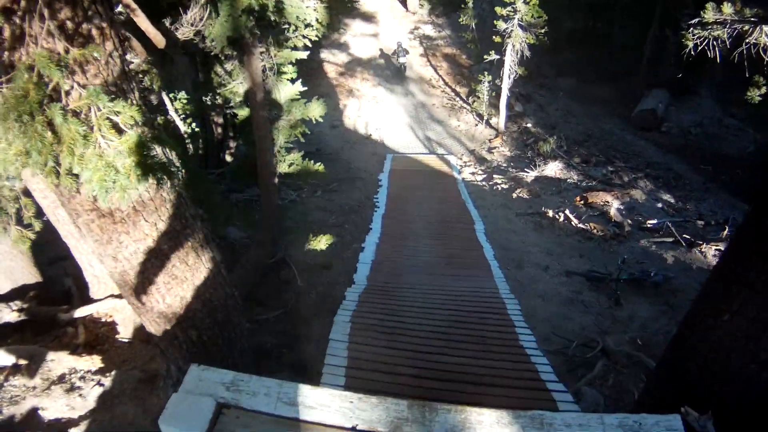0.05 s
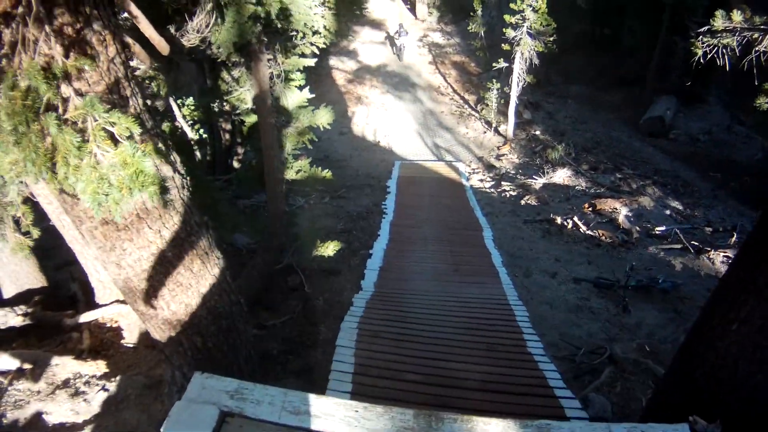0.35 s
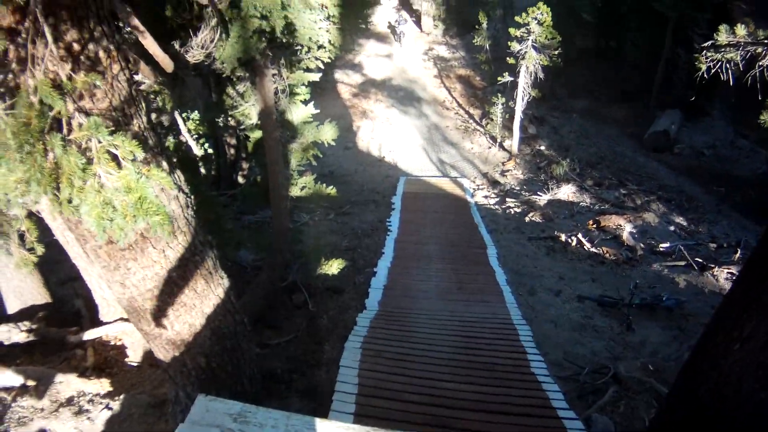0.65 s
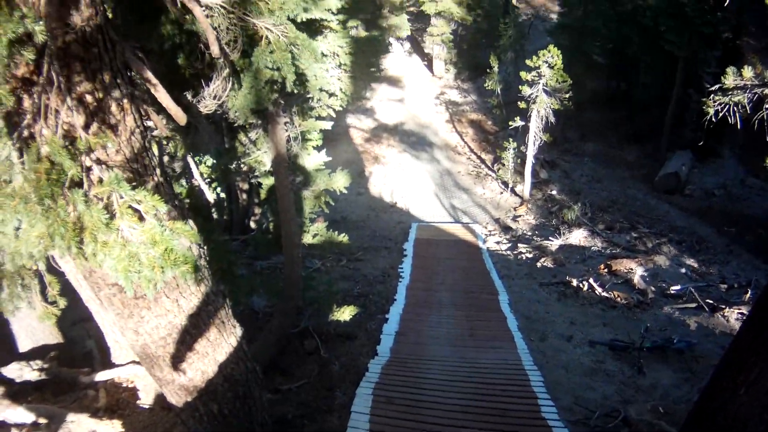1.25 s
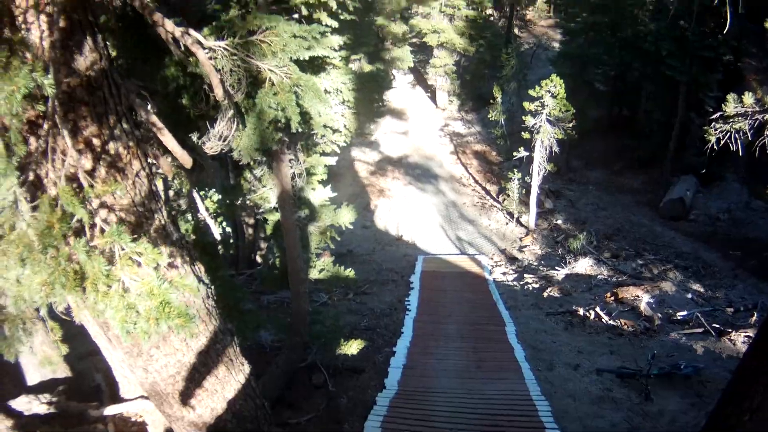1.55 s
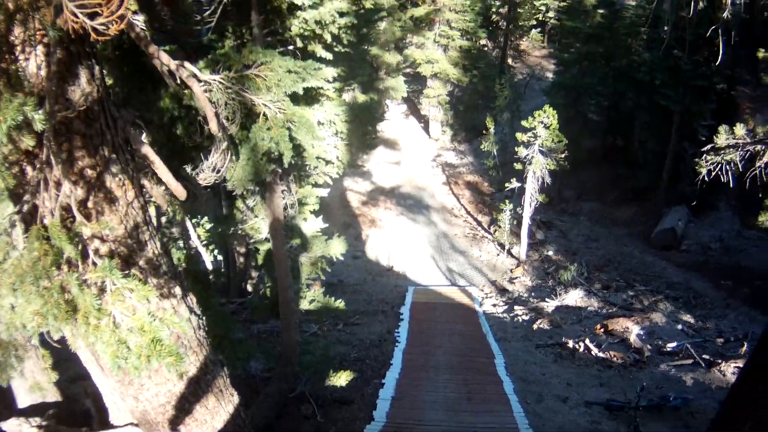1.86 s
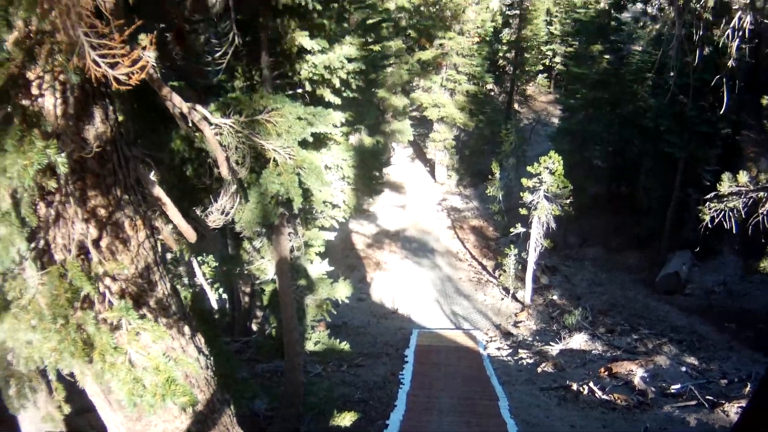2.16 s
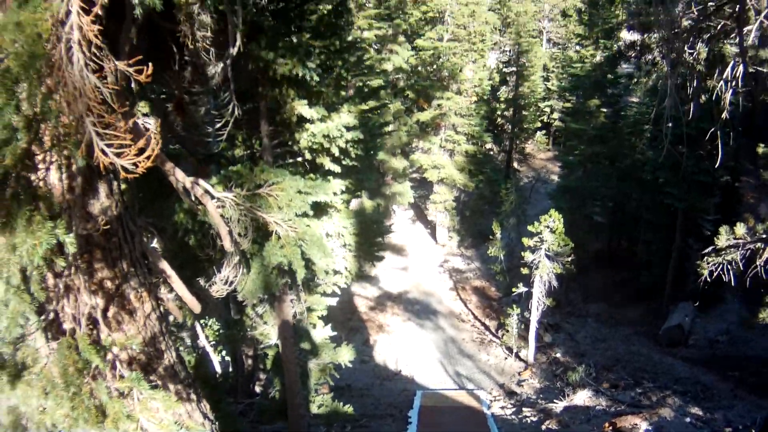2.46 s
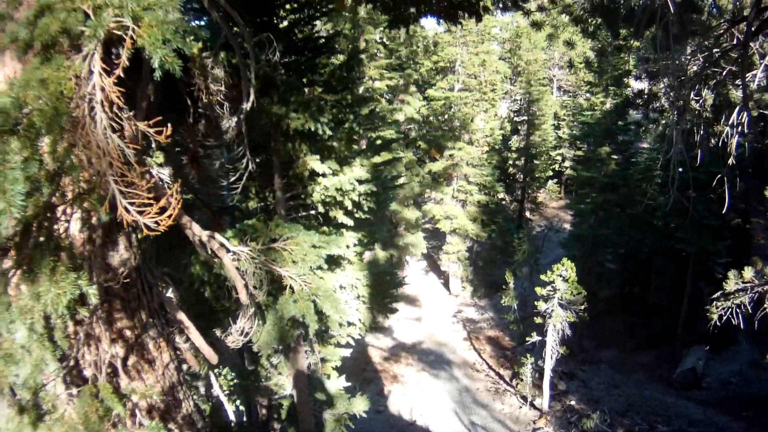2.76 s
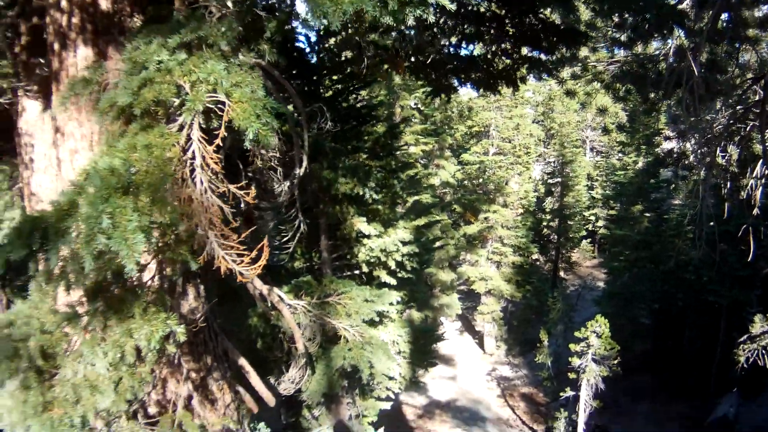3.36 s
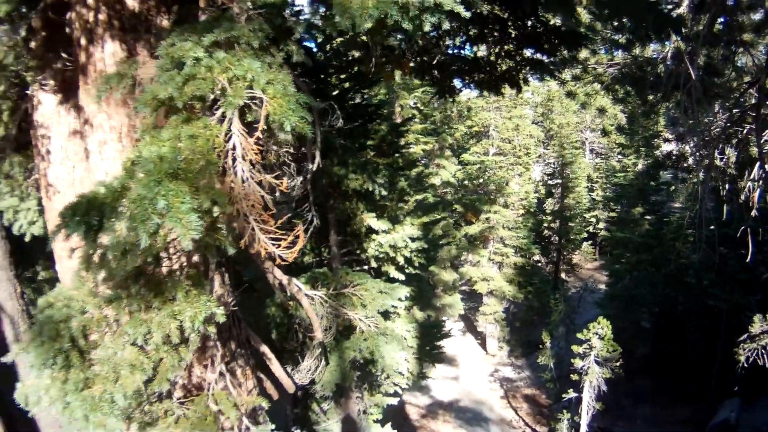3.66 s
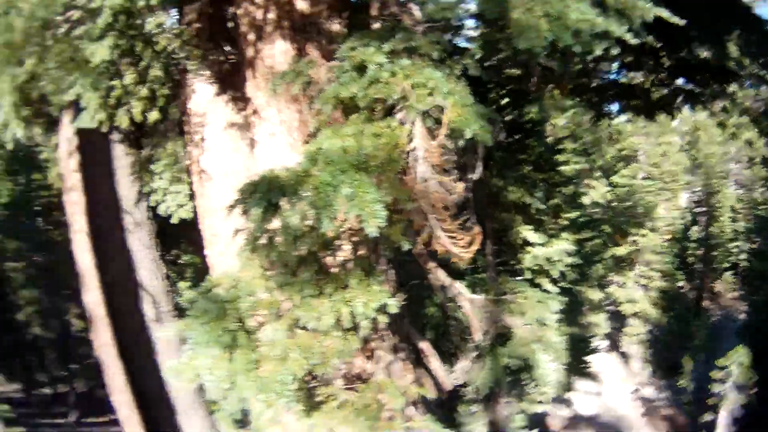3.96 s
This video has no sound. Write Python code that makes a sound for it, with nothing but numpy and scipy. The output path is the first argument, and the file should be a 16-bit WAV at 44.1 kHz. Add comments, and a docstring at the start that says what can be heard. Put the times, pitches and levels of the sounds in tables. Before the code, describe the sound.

Handling noise on a hand-held camera in a still forest. Faint hiss and a soft electronic buzz run with a few light finger bumps, then fingers rub the case and knock it sharply, right at the microphone.

```python
"""Hiss, a soft frame-rate buzz and a thin whine: the electronics of a hand-held camera in a still forest.
The buzz is a current switching on and off once a frame. Fingers bump the case now and then and its
modes ring; the grip creaks faintly. Near the end the fingers rub over the case in stick-slip grains
and knock it, and the loudest knock overloads the microphone."""
import sys
import numpy as np
from scipy import signal
from scipy.fft import rfft, irfft
from scipy.io import wavfile

SR = 44100
rng = np.random.default_rng(int(sys.argv[2]) if len(sys.argv) > 2 else 0)


def unload_wav(signal):
    """Save mono or channel-first audio to the path in sys.argv[1] as 16-bit WAV at rate SR, clipped to [-1, 1]."""
    wavfile.write(
        sys.argv[1],
        SR,
        np.round(np.clip(np.atleast_2d(signal).T, -1, 1) * 32767).astype(np.int16),
    )


N = 176400  # 4 s


def undb(db):
    """Decibels to gain."""
    return 10 ** (np.asarray(db) / 20)


def unit(x):
    """Scale to rms 1."""
    return x / np.std(x)


def cut(x, hz, kind="low", order=2):
    """Low-pass or high-pass."""
    return signal.sosfilt(signal.butter(order, min(hz, .45 * SR), kind, fs=SR, output="sos"), x)


def band(x, hz, width_hz):
    """One resonance, gain 1 at the centre."""
    return signal.lfilter(*signal.iirpeak(hz, hz / width_hz, fs=SR), x)


def noise():
    """White noise."""
    return rng.standard_normal(N)


def wander(hz):
    """Random drift below hz, rms 1."""
    return unit(cut(noise(), hz))


# Each row: mode frequency in Hz, gain in dB, decay time T60 in seconds.
CASE_MODES = [(169.2, 2, 0.11), (249.3, -1, 0.12), (296, 2, 0.027), (550, 2, 0.12), (675, 6, 0.038),
              (940, 6.5, 0.034), (1013, 5.5, 0.029), (1272, 5, 0.027), (1736, 4, 0.038), (1867, 4, 0.017),
              (2320, 3, 0.02), (2570, -2.5, 0.039), (3080, -7.5, 0.053), (3170, -9, 0.052),
              (4580, -20, 0.058), (5670, -26, 0.03)]

def case_ring(drive):
    """The camera case rings in damped modes."""
    return sum(undb(db) * band(drive, hz, np.log(1000) / np.pi / t60_s) for hz, db, t60_s in CASE_MODES)


# Each row: start in seconds, clack in dB, thump in dB, contact length in seconds, low-pass in Hz.
KNOCK_HITS = [(3.7209, 4, -11, 0.00857, 3830), (3.8358, -4.5, -24, .007, 1800),
              (3.926, -8.5, -32, 0.01, 5150), (3.9458, 26.5, -3.5, 0.0048, 9900),
              (3.958, -2, -43, 0.00086, 14000)]
# Each row: start in seconds, push level in dB.
FINGER_BUMPS = [(.305, -37), (0.681, -41), (1.74, -33.5), (2.394, -30), (3.389, -33), (3.587, -32),
                (3.652, -26), (3.755, -29)]

def knocks(t, push_hz=161.3, push_width_hz=64, crack_db=-50, crack_hz=7900):
    """Hard contacts and soft pushes ring the case; the hard ones also crack directly."""
    hard, soft = np.zeros(N), np.zeros(N)
    for start_s, clack_db, thump_db, length_s, top_hz in KNOCK_HITS:
        i = int(start_s * SR)
        contact = cut(clatter(length_s), top_hz, order=4)[:N - i]
        hard[i:i + len(contact)] += undb(clack_db) * contact
        soft += undb(thump_db) * push(t, start_s)
    for start_s, db in FINGER_BUMPS:
        soft += undb(db) * push(t, start_s)
    thumps = band(band(soft + 1e-18, push_hz, push_width_hz), push_hz, push_width_hz)
    crack = cut(cut(hard + 1e-18, crack_hz, order=1), 170, "high")
    return case_ring(hard + thumps) + undb(crack_db) * crack


def clatter(length_s, chatter_db=-7.5, chatter_s=0.0031):
    """A brief hard, rough contact that dies away in fine chatter."""
    grit = rng.standard_normal(4096)
    age_s = np.arange(len(grit)) / SR
    window = np.sqrt(np.abs(np.sin(np.pi * np.minimum(age_s / length_s, 1))))
    for _ in range(12):  # flatten the spectrum
        spectrum = rfft(grit * window)
        grit = irfft(spectrum / (np.abs(spectrum) + 1e-12))
    grit *= window
    chatter = np.exp(-age_s / chatter_s) * rng.standard_normal(len(grit)) / np.sqrt(chatter_s * SR / 2)
    return grit / np.linalg.norm(grit) + undb(chatter_db) * chatter


def push(t, start_s, length_s=0.0022):
    """A soft half-sine push of a fingertip."""
    return np.sin(np.pi * np.clip((t - start_s) / length_s, 0, 1))


# Each row: time in seconds, rub level in dB, rumble level in dB.
SLIDE_LEVELS = [(3.3, -95, -76), (3.6, -78, -68.5), (3.69, -68, -57), (3.715, -60.5, -50),
                (3.765, -55, -39), (3.79, -58, -53), (3.821, -47.5, -44), (3.86, -57.5, -46),
                (3.91, -57, -52), (3.96, -39, -50), (4.0, -42, -41)]
# Each row: centre in Hz, width in Hz, relative gain in dB.
RUB_BANDS = [(294, 72, -6), (770, 290, -1), (1007, 100, 11), (1230, 160, -37), (1760, 320, -3.5),
             (2470, 130, -5), (3270, 250, -9), (3860, 280, -5.5), (4080, 260, -9)]

def finger_slide(t, grain_depth=0.12, top_hz=4330, hiss_db=-18.5, rumble_hz=130):
    """Skin sticks and slips on the case in fine grains, over the rumble of the grip."""
    times_s, rub_db, rumble_db = np.array(SLIDE_LEVELS).T
    grains = noise() * np.exp(grain_depth * wander(500))
    body = sum(undb(db) * band(grains, hz, width_hz) for hz, width_hz, db in RUB_BANDS)
    rub = unit(cut(body, top_hz, order=16)) + undb(hiss_db) * unit(cut(grains, 5500))
    rumble = unit(cut(cut(noise(), rumble_hz, order=3), 23, "high"))
    return rub * undb(np.interp(t, times_s, rub_db)) + rumble * undb(np.interp(t, times_s, rumble_db))


FRAME_HZ = 29.97

def frame_buzz(t, first_s=.0305, on_s=.007, step_db=-46.5, off_boost_db=2.5, sag_hz=84.6, edge_hz=895):
    """A current switches on and off once a frame; each step sags away."""
    starts_s = np.arange(first_s - 1 / FRAME_HZ, N / SR, 1 / FRAME_HZ)
    on_size, off_size = undb(1.5 * rng.standard_normal((len(starts_s), 2))).T  # 1.5 dB scatter
    steps = np.zeros(N)
    for when_s, size in ((starts_s, on_size), (starts_s + on_s, -undb(off_boost_db) * off_size)):
        inside = (when_s > 0) & (when_s < t[-1])
        steps[(when_s[inside] * SR).astype(int)] = size[inside]
    sagging = signal.lfilter([1], [1, -np.exp(-2 * np.pi * sag_hz / SR)], steps)
    return undb(step_db) * cut(sagging, edge_hz)


def whine(t, base_hz=235.65, base_db=-75, db_per_octave=-4):
    """The electronics whine thinly in odd harmonics, from the third up."""
    tone = np.zeros(N)
    for k in range(3, 40, 2):
        rms = undb(base_db + db_per_octave * np.log2(k))
        tone += np.sqrt(2) * rms * np.sin(2 * np.pi * (k * base_hz * t + rng.random()))
    return tone


# Each row: peak time in seconds, level in dB, Gaussian sigma in seconds.
CREAK_SWELLS = [(0.463, -73, .006), (0.525, -73, .009), (.89, -66, 0.009), (0.97, -73, .008),
                (1.535, -66, 0.0051)]
# Each row: centre in Hz, width in Hz, relative level in dB.
CREAK_BANDS = [(3020, 300, 0), (4330, 1200, 2), (5080, 1100, -2)]

def grip_creaks(t):
    """The grip creaks faintly in a few high resonances."""
    swells = sum(undb(db) * np.exp(-.5 * ((t - peak_s) / sigma_s) ** 2)
                 for peak_s, db, sigma_s in CREAK_SWELLS)
    ring = sum(undb(db) * unit(band(band(noise(), hz, width_hz), hz, width_hz))
               for hz, width_hz, db in CREAK_BANDS)
    return swells * unit(ring)


def flutter(t, peak_s=0.089, level_db=-72, flicker_db=2.4, hz=1300, width_hz=320):
    """A faint whisper on every third frame, perhaps the lens adjusting."""
    phase = (t - peak_s) * FRAME_HZ / 3
    gate = np.abs(np.cos(np.pi * phase)) ** 5 * undb(flicker_db * wander(5.8))
    whisper = unit(cut(band(noise(), hz, width_hz), 2400))
    return undb(level_db) * gate * whisper


# Each row: time in seconds, level in dB.
SHIMMER_LEVELS = [(0, -87.5), (.5, -84.5), (.95, -80), (1.25, -91), (1.42, -82), (1.7, -92), (4, -91)]

def grip_shimmer(t, hz=2947, width_hz=170, flicker_db=6):
    """A faint ring near the lowest creak resonance flickers throughout."""
    level_db = np.interp(t, *np.array(SHIMMER_LEVELS).T) + flicker_db * wander(7.4)
    return undb(level_db) * unit(band(noise(), hz, width_hz))


# Each row: frequency in Hz, relative spectral density in dB.
AIR_SPECTRUM = [(15, 32.5), (42, 26.5), (70, 14), (120, 6), (160, 30.5), (200, 11), (240, 14.5), (310, 18),
                (900, 8.5), (1700, 7.5), (3600, 4.5), (4800, 3), (5250, 8), (5700, 3.5), (7000, 3),
                (15500, 3)]

def air(level_db=-63.5, swell_db=0.5):
    """Still forest air under the hiss of the microphone."""
    hz, db = np.array(AIR_SPECTRUM).T
    bins_hz = np.fft.rfftfreq(N, 1 / SR)
    colour = undb(np.interp(np.log(bins_hz + 1), np.log(hz), db))
    hiss = unit(irfft(rfft(noise()) * colour, N))
    return hiss * undb(level_db - swell_db * wander(8))


def scene(port_lag_db=-24, port_hiss_db=-75.5):
    """All sources are centred; two close microphone ports differ by a tiny lag and by hiss."""
    t = np.arange(N) / SR
    handling = knocks(t) + finger_slide(t) + grip_creaks(t) + grip_shimmer(t)
    mid = handling + frame_buzz(t) + whine(t) + flutter(t) + air()
    side = undb(port_lag_db) * np.gradient(mid) + undb(port_hiss_db) * cut(noise(), 1500, "high")
    return np.array([mid + side, mid - side])


def record(dry, top_hz=15400):
    """The input saturates at full scale and the top is cut."""
    return signal.sosfilt(signal.ellip(10, .1, 60, top_hz, fs=SR, output="sos"), np.tanh(dry))


dry = scene()
out = record(dry)
unload_wav(out)
```